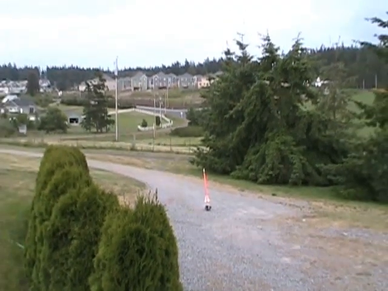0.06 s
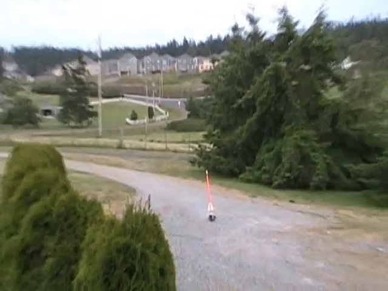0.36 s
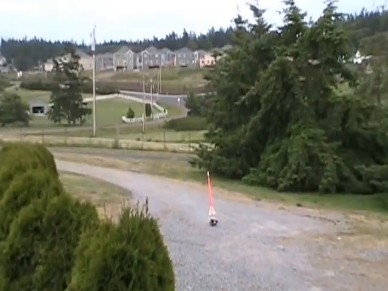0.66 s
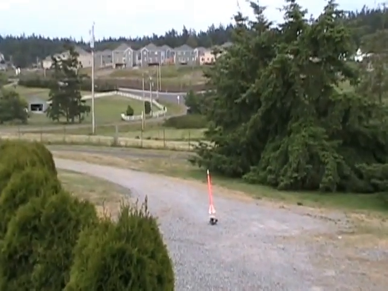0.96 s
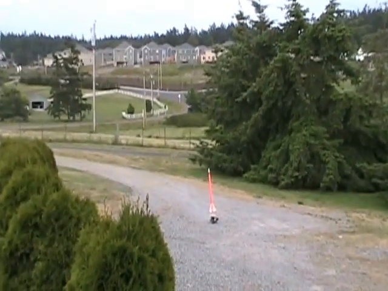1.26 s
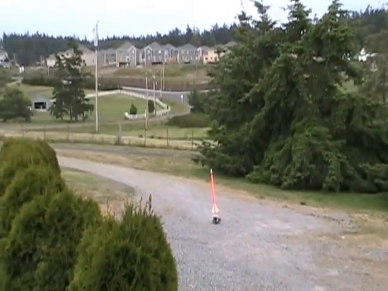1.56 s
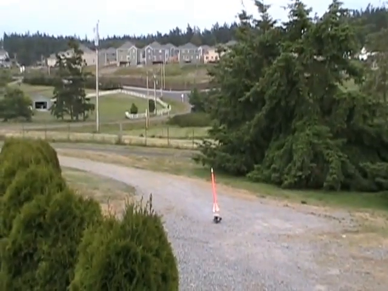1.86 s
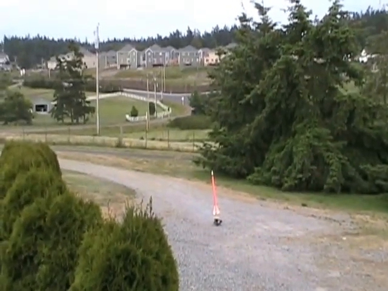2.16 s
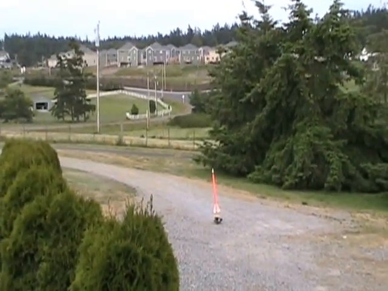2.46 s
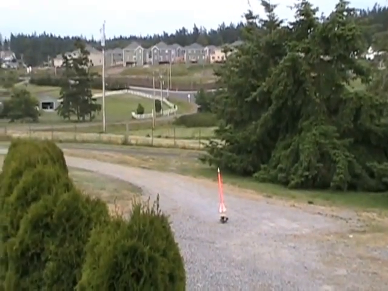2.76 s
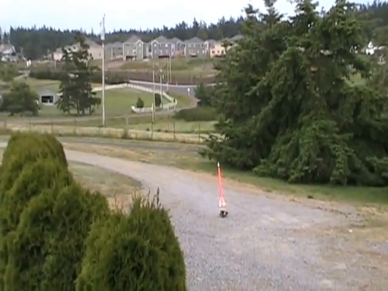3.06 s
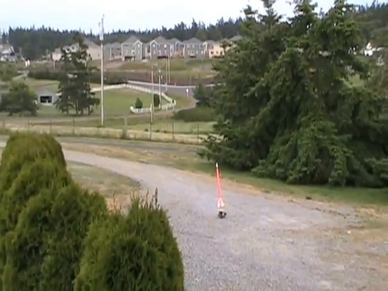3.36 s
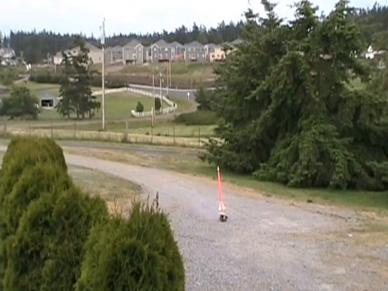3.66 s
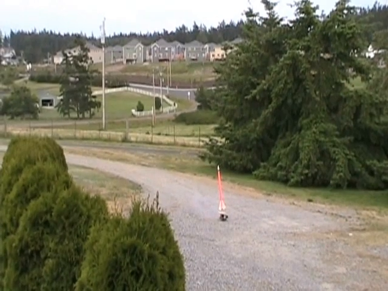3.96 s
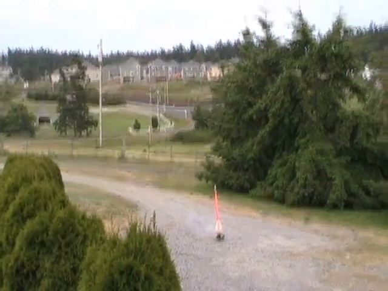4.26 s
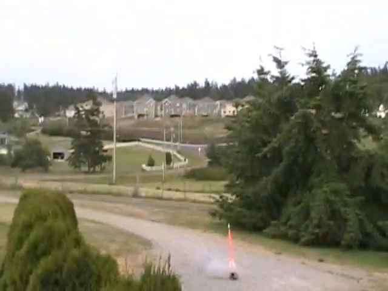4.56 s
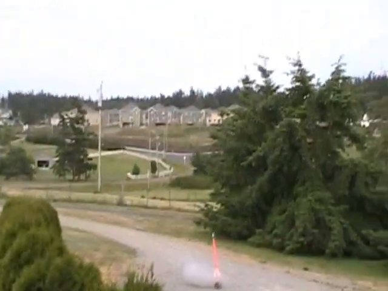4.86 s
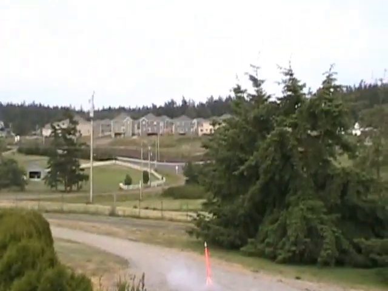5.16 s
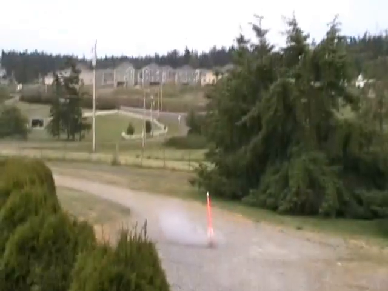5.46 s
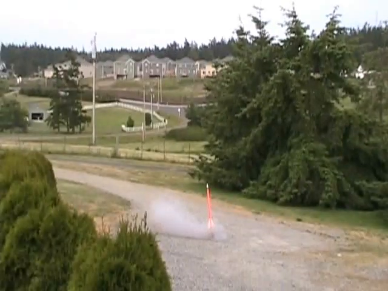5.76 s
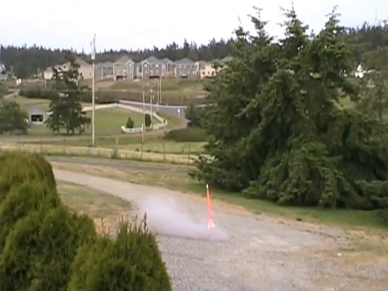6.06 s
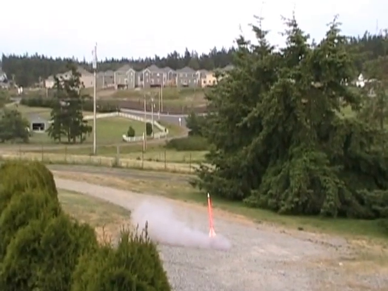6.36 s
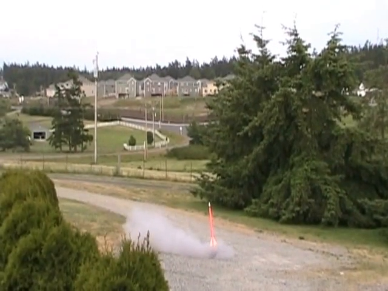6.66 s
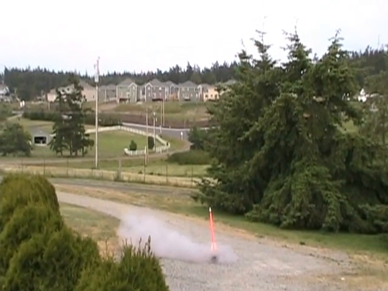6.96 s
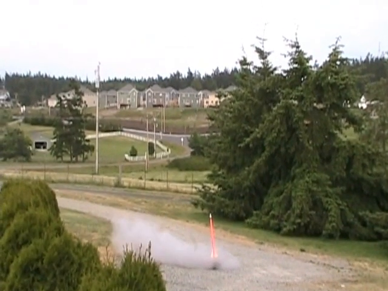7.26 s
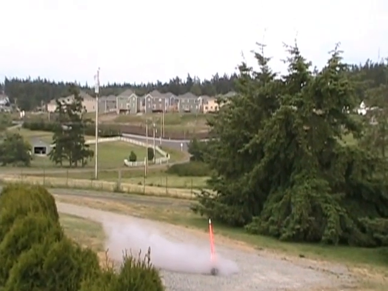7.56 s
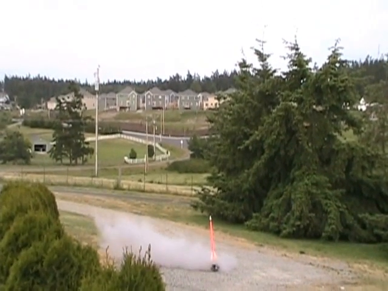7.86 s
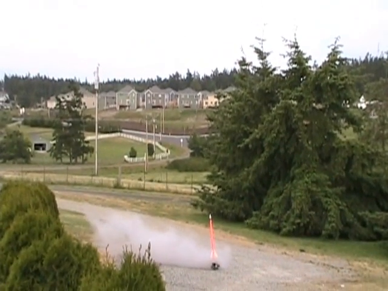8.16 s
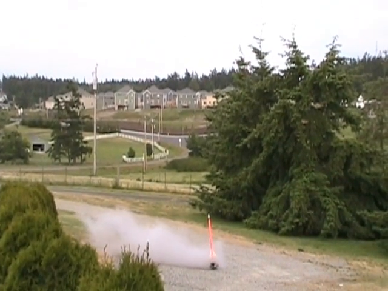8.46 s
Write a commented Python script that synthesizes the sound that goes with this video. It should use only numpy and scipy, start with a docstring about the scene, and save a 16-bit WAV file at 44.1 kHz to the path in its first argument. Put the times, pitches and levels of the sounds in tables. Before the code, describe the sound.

After faint bird chirps, a thin rising sizzle swells into a small rocket motor's strong, crackling hiss.

```python
"""Small rocket motor on a gravel driveway

A homemade motor burns some way from a hand-held tape camcorder. A thin sizzle climbs in pitch as the
fuel catches, then turbulent jet noise takes over: a surging hiss from fine eddies at the nozzle, a hollow
roar from large ones in the plume, crackle and one spit. Under it lie the quiet of the yard, birds, a far
yelp, a faint hum, the whine of the tape drive and wind on the two microphone ports."""
import sys
import numpy as np
from scipy import signal
from scipy.fft import rfft, irfft
from scipy.io import wavfile
from scipy.ndimage import uniform_filter1d

SR = 44100
rng = np.random.default_rng(int(sys.argv[2]) if len(sys.argv) > 2 else 0)


def generate_wav(signal):
    """Clip the signal to [-1, 1] and save it as 16-bit WAV at the path in sys.argv[1]."""
    frames = np.transpose(np.atleast_2d(signal))
    scaled = np.clip(frames, -1, 1) * 32767
    pcm = np.round(scaled).astype(np.int16)
    wavfile.write(sys.argv[1], SR, pcm)


N = 375291
TIME = np.arange(N) / SR

# The course of the burn. Each row: time in seconds, hiss level in dB, gas speed as a factor on pitch.
BURN = [(3.96, -44, 0.9), (4.13, -42.5, 0.84), (4.33, -41.5, 0.79), (4.6, -35.5, 0.89), (5.05, -34.5, 0.95),
        (5.6, -32.5, 0.98), (6.25, -32.5, 1.02), (6.75, -28, 1.065), (7.1, -29, 0.89), (7.35, -30.4, 0.91),
        (8.03, -38, 0.94), (8.5, -36.5, 0.93)]
# Surges as the grain flares. Each row: centre in seconds, length in seconds, extra hiss in dB.
SURGES = [(4.18, .12, 1.5), (4.76, 0.21, 2.5), (5.35, 0.19, 2), (5.62, 0.14, 2), (5.87, 0.17, 3.5),
          (6.955, 0.15, 3.0), (7.24, 0.2, 3), (7.7, 0.06, 2)]
CRUISE_DB = -32


def amp(db):
    """Decibels to amplitude ratio."""
    return 10 ** (np.asarray(db) / 20)


def unit(x):
    """Normalises to rms 1."""
    return x / np.sqrt(np.mean(x ** 2) + 1e-20)


def at_hz(points, hz):
    """Interpolates a spectrum on a log-frequency axis."""
    f, value = np.transpose(points)
    return np.interp(np.log(hz + 1), np.log(f + 1), value)


def at_time(rows, t):
    """Interpolates each column of a table in time."""
    s, *columns = np.transpose(rows)
    return [np.interp(t, s, column) for column in columns]


def add(mix, s, sound):
    """Superposes a sound on a track at s seconds."""
    part = mix[round(s * SR):][:len(sound)]
    part += sound[:len(part)]


def hump(t, s, length):
    """Gaussian pulse of height 1 centred on s, length wide at half height."""
    return .5 ** ((2 * (t - s) / length) ** 2)


def swells(rows, t):
    """Sum of Gaussian pulses, in dB."""
    return sum(db * hump(t, s, length) for s, length, db in rows)


def drift(rate_hz):
    """Random modulation: low-pass noise of rms 1."""
    hz = np.fft.rfftfreq(N, 1 / SR)
    return unit(irfft(rfft(rng.standard_normal(N)) / (1 + (hz / rate_hz) ** 4), N))


def noise(spectrum):
    """Stationary noise of rms 1, shaped by (Hz, dB) points."""
    gain = amp(at_hz(spectrum, np.fft.rfftfreq(N, 1 / SR)))
    return unit(irfft(rfft(rng.standard_normal(N)) * gain, N))


def grid(size):
    """Frame times (a column) and bin frequencies of short-time spectra."""
    return np.arange(4 * N // size + 5)[:, None] * size / 4 / SR, np.fft.rfftfreq(size, 1 / SR)


def turbulence(db, size, patchy_db, flicker_db):
    """Partially coherent noise at two ports, shaped in time and frequency; their mean has rms 1."""
    # Phase between the ports. Each row: frequency in Hz, lead of the left in radians.
    port_phase = [(100, 0.56), (2800, 0), (4600, 0.6), (6000, .6), (7800, 1.42), (11000, 1.74),
                  (14000, 1.85), (16000, 2.5)]
    # Their balance. Each row: frequency in Hz, left over right in dB.
    port_balance = [(200, -4.5), (700, 3.5), (1300, 2), (4000, 0), (5500, 2), (7000, -1.5), (8500, 1.8),
                    (11000, 3), (13500, 1)]
    # Their likeness. Each row: frequency in Hz, coherence from 0 to 1.
    port_coherence = [(200, .8), (700, .9), (2000, .75), (4200, .6), (7000, .78), (10000, .8), (15500, .72)]
    t, hz = grid(size)
    a, b, c, d, patches = rng.standard_normal((5, len(t), len(hz)))
    patches = unit(uniform_filter1d(uniform_filter1d(patches, size=10, axis=0), size=24, axis=1))
    flicker = unit(uniform_filter1d(rng.standard_normal(len(t)), size=8))[:, None]
    coherence = at_hz(port_coherence, hz)
    phase = at_hz(port_phase, hz)
    side = amp(at_hz(port_balance, hz) / 2)
    left = a + 1j * b
    right = (coherence * left + np.sqrt(1 - coherence ** 2) * (c + 1j * d)) * np.exp(-1j * phase)
    sum_gain = np.sqrt(side ** 2 + side ** -2 + 2 * coherence * np.cos(phase))
    shape = amp(db + patchy_db * patches + flicker_db * flicker) / sum_gain
    spectra = np.array([left * side, right / side]) * shape
    x = signal.istft(spectra, nperseg=size, noverlap=size - size // 4, time_axis=1, freq_axis=2)[1]
    return x[:, :N] / np.std(x[:, :N].mean(0))


def yard(air_db=-51.5, port_db=-45):
    """Ambient noise: distant wash reaches the ports in phase, their own rumble is in antiphase."""
    # Outdoor wash. Each row: frequency in Hz, relative spectral density in dB.
    air_spectrum = [(15, -25), (45, -7.5), (85, -1), (130, -4.5), (175, -4.5), (240, -5.5), (430, -10.5),
                    (700, -6), (880, -9.5), (1240, -10), (2300, -14.5), (4000, -13), (6000, -15.5),
                    (9000, -20.5), (15500, -26.5)]
    # The ports' rumble in calm air, with the same columns.
    port_spectrum = [(12, -30), (30, -3), (85, -2.5), (170, -3.5), (280, -8.5), (500, -15), (1100, -20.5),
                     (1800, -29.5), (3000, -27.5), (4500, -27), (12000, -28.5), (15500, -30)]
    air = amp(air_db + .85 * drift(2.7)) * noise(air_spectrum)
    rumble = amp(port_db + .5 * drift(6)) * noise(port_spectrum)
    return np.array([air + rumble, air - rumble]) * amp([[.3], [-.3]])


def rustle(rise_s=.1, fall_s=.17, rest_db=-68, brighten_s=3.3):
    """Amplitude-modulated noise: a faint high rustle swells, and brightens as a higher fizz grows."""
    # Swells of the rustle. Each row: start in seconds, length in seconds, relative level in dB.
    rustles = [(0, .8, -54.5), (1.08, .4, -55.5), (1.92, 0.4, -56), (2.73, 0.15, -56.5), (3.4, 0.064, -61)]
    body_spectrum = [(3000, -31), (5000, 1), (6800, 3), (10000, -3.5), (13000, -19), (16000, -20)]
    fizz_spectrum = [(8000, -31), (11000, 3), (12500, 2), (15700, -.5), (17500, -40)]
    _, hz = grid(size=512)
    body = turbulence(at_hz(body_spectrum, hz), size=512, patchy_db=1.6, flicker_db=.7)
    fizz = turbulence(at_hz(fizz_spectrum, hz), size=512, patchy_db=1.2, flicker_db=1)
    swell = amp(rest_db)
    for s, length, db in rustles:
        swell += amp(db) * np.interp(TIME - s, [-rise_s, 0, length, length + fall_s], [0, 1, 1, 0])
    fizz_gain = amp(np.interp(TIME, [0, brighten_s], [-72, -63])) * (swell / amp(rest_db)) ** .25
    return body * swell * amp(-2.5) + fizz * fizz_gain


def hum(hz=318, waver=.01197, start_db=-72.5, grows_from_s=3.7, db_per_s=3):
    """A faint, growing tone under random frequency and amplitude modulation."""
    pitch = hz * (1 + waver * drift(12.3))
    db = start_db + db_per_s * np.maximum(TIME - grows_from_s, 0)
    return np.sqrt(2) * amp(db + 1.5 * drift(6)) * np.sin(2 * np.pi * np.cumsum(pitch) / SR)


def tape_drive(flutter=.00051, waver_db=1.86):
    """Rotating machinery: the head drum and its motor radiate tones, and close pairs beat."""
    # Drive tones. Each row: frequency in Hz, rms level in dB.
    tones = [(86, -67), (167, -65), (2918, -70), (2934, -75), (3499, -65.5), (3515, -67.5), (4393, -68),
             (4425, -68), (4667, -63), (4683, -61.5), (5023, -81), (5249, -71), (5265, -76), (5835, -68),
             (5852, -66.5), (9948, -76), (11536, -81), (11666, -77), (11703, -71.5)]
    clock = TIME + np.cumsum(flutter * drift(26)) / SR
    out = np.zeros((2, N))
    for hz, db in tones:
        phase, right_lead = rng.uniform(0, 2 * np.pi), rng.uniform(-2, 1)
        tone = np.sqrt(2) * np.sin(2 * np.pi * hz * clock + phase + np.array([[0], [right_lead]]))
        out += amp(db + waver_db * drift(21)) * tone
    return out


def wind(calm_db=-56, bump_hz=42, bump_s=.007, shared_db=-15):
    """Pressure fluctuations: gusts and bumps drive the ports in antiphase, with a weak in-phase part."""
    # Gusts on the microphone. Each row: centre in seconds, length in seconds, level in dB.
    gusts = [(3.88, .1, -51), (4.963, .1, -36), (5.88, 0.099, -36), (6.65, .1, -43), (7.32, 0.065, -39),
             (7.528, 0.14, -36.5)]
    breeze = (7.3, 2, -47)  # one long, weak gust
    # Low bumps on the microphone. Each row: start in seconds, envelope peak in dB.
    bumps = [(3.905, -25), (4.765, -23), (4.912, -16), (5.89, -28), (7.19, -26), (7.49, -24)]
    eddies = [(10, -24), (25, -7), (45, 2.5), (65, -2.5), (100, -12), (250, -38), (1500, -80)]
    strength = amp(calm_db) + sum(amp(db) * hump(TIME, s, length) for s, length, db in [breeze, *gusts])
    strength *= amp(1.7 * drift(10))
    opposed = strength * noise(eddies)
    shared = strength * noise(eddies) * amp(shared_db)
    t = np.arange(0, .1, 1 / SR)
    bump = t / bump_s * np.exp(1 - t / bump_s) * np.sin(2 * np.pi * bump_hz * t)
    for s, db in bumps:
        add(opposed, s, amp(db) * bump)
    return np.array([shared + opposed, shared - opposed])


def yelp(second_db=-9, arch=.05):
    """A far animal's voiced call: two harmonics on a slightly arched pitch."""
    # The call: start in seconds, length in seconds, top pitch in Hz, level in dB.
    call = (2.82, .12, 728, -53)
    s, length, hz, db = call
    u = np.linspace(0, 1, round(length * SR))
    phase = 2 * np.pi * np.cumsum(hz * (1 - arch * (2 * u - 1) ** 2)) / SR
    out = np.zeros(N)
    add(out, s, amp(db) * np.sin(np.pi * u) * (np.sin(phase) + amp(second_db) * np.sin(2 * phase)))
    return out


def birds(scoop_s=.011, quaver=.0072):
    """Frequency-modulated whistles: far notes glide to a held pitch, quaver and fade."""
    # Each row: start in seconds, length in seconds, level in dB, held pitch in Hz, starting pitch ratio.
    notes = [(1.052, .088, -52, 3790, .87), (1.25, .088, -51, 3790, 0.81), (1.44, .08, -59, 2380, 1.0),
             (1.452, .088, -53, 3800, .9), (1.935, .04, -55, 4700, 1.22), (4.04, .088, -52, 3490, 1.0)]
    out = np.zeros(N)
    for s, length, db, held, ratio in notes:
        t = np.arange(0, length, 1 / SR)
        scoop = (ratio - 1) * np.exp(-(t / scoop_s) ** 2 / 2)
        pitch = held * (1 + scoop + quaver * drift(150)[:len(t)])
        envelope = np.interp(t / length, [0, .15, .45, 1], [0, .98, 1, .27])
        add(out, s, amp(db) * envelope * np.sin(2 * np.pi * np.cumsum(pitch) / SR))
    return out


def ticks_and_spit(size=2048):
    """Damped transients: ticks in the yard and the motor's spit are noise bands decaying exponentially."""
    # Each row: start in seconds, peak in dB, centre in Hz, width in octaves, 60 dB decay time in seconds.
    bursts = [(.167, -43, 3300, .2, .03), (.967, -41, 2900, .3, .025), (3.37, -45, 3000, .2, .02),
              (4.53, -19, 1800, 1.4, 0.011), (4.5331, -24.5, 800, 0.96, 0.0097)]
    t, hz = np.arange(size) / SR, np.fft.rfftfreq(size, 1 / SR)
    out = np.zeros(N)
    for s, db, centre, octaves, t60 in bursts:
        band = np.exp(-.5 * (np.log2((hz + 1) / centre) / octaves) ** 2)
        burst = irfft(band * np.exp(2j * np.pi * rng.random(len(hz)))) * amp(-60 * t / t60)
        add(out, s, amp(db) * burst / abs(burst).max())
    return out


def thrust_db():
    """Level of the burn, with its surges, relative to cruising strength."""
    return at_time(BURN, TIME)[0] + swells(SURGES, TIME) - CRUISE_DB


def crackle(per_s=110, relative_db=-3, spread_db=8, start_s=4.1):
    """Shot noise: burning grains snap at random in the exhaust, louder when the jet is strong."""
    sizes = amp(spread_db * np.minimum(rng.exponential(1, N), 2))
    impulses = sizes * (rng.random(N) < per_s / SR) * rng.choice([-1, 1], N)
    snaps = signal.sosfilt(signal.butter(1, [900, 9000], "bandpass", fs=SR, output="sos"), impulses)
    snaps *= 2 * amp(CRUISE_DB + thrust_db() + relative_db) * (TIME > start_s)
    return np.array([snaps, np.roll(snaps, 1)])


def sizzle(relative_width=.13):
    """Narrow-band flow noise: gas first seeps from the nozzle, its pitch climbing with the pressure."""
    # The fuel catching. Each row: time in seconds, pitch in Hz, level in dB.
    ignition = [(2.5, 4500, -80), (2.88, 4620, -58), (3.2, 4900, -58), (3.5, 4870, -56.5),
                (3.66, 5560, -52.5), (3.92, 5700, -53), (4.04, 5700, -47), (4.13, 5740, -43),
                (4.3, 5400, -51), (4.6, 5500, -68)]
    t, hz = grid(size=512)
    pitch, _ = at_time(ignition, t)
    _, level_db = at_time(ignition, TIME)
    band_db = -20 * np.log10(1 + (np.log((hz + 1) / pitch) / relative_width) ** 2)
    return turbulence(band_db, size=512, patchy_db=.5, flicker_db=0) * amp(level_db)


def jet(roar_db=-39, spray_db=-42, light_s=3.97, rise_s=.19, roar_builds_s=.39):
    """Turbulent jet noise: a hiss whose frequencies scale with gas speed, a fizzing spray and a roar."""
    # Fine turbulence at the nozzle. Each row: frequency in Hz, relative spectral density in dB.
    hiss_spectrum = [(1200, -24.5), (2400, -13.5), (3300, -8.5), (4100, -6.5), (5000, -4), (6300, -0.5),
                     (8000, -1.5), (10000, -4), (12500, -15), (15700, -29)]
    # Large eddies of the plume with their ground reflection, with the same columns.
    roar_spectrum = [(30, -32), (120, -15.5), (300, -9.5), (400, -10.5), (570, -0.2), (730, 0), (980, -7),
                     (1250, -5), (1900, -6), (2150, -9), (2500, -9), (3300, -20), (6000, -42)]
    spray_spectrum = [(7000, -37), (10500, -2.5), (12800, -.5), (15700, -.5), (17500, -40)]
    # Peaks and dips from the ground and the camera's shell. Each row: centre in Hz, width in Hz, gain in dB.
    path = [(770, 110, 2), (1010, 130, -2), (1160, 110, 2), (2190, 160, -3), (2950, 160, 1.5),
            (3270, 170, -3), (3720, 170, -3), (4750, 200, 1.5), (6100, 300, 1.2), (8200, 400, -1.8),
            (10030, 300, 1.2), (11450, 400, 1.5)]
    # Billows of the plume. Each row: centre in seconds, length in seconds, extra roar in dB.
    billows = [(4.75, .32, 3.8), (6.16, .15, 3), (7.39, 0.43, 5)]
    t, hz = grid(size=1024)
    path_db = sum(db * np.exp(-.5 * ((hz - centre) / (width / 2)) ** 2) for centre, width, db in path)
    speed = at_time(BURN, t)[1] * amp(.13 * swells(SURGES, t))
    shifted_db = at_hz(hiss_spectrum, hz / speed) - 10 * np.log10(speed)
    hiss = turbulence(shifted_db + path_db, size=1024, patchy_db=.6, flicker_db=.2)
    spray = turbulence(at_hz(spray_spectrum, hz) + path_db, size=1024, patchy_db=.7, flicker_db=2)
    roar = turbulence(at_hz(roar_spectrum, hz) + path_db, size=1024, patchy_db=.9, flicker_db=.4)
    push_db, sputter_db = thrust_db(), drift(4.9)
    gas = hiss * amp(CRUISE_DB + push_db) + spray * amp(spray_db + 1.03 * push_db + sputter_db)
    # the plume takes a moment to build after the motor lights
    lag_db = -4 * np.exp(-((TIME - light_s) / roar_builds_s) ** 2)
    plume = roar * amp(roar_db + .69 * push_db + swells(billows, TIME) + lag_db)
    # the grain burns unevenly, so the whole jet flutters together
    flutter = amp(.43 * drift(51))
    lit = np.clip((TIME - light_s) / rise_s, 0, 1)
    return flutter * (lit ** 2 * gas + lit ** 4 * plume)


def scene():
    """Superposition of the motor, the yard and the camera's own noises."""
    motor = sizzle() + jet() + crackle()
    return motor + ticks_and_spit() + birds() + yelp() + yard() + rustle() + hum() + wind() + tape_drive()


def record(dry):
    """Band limiting: the camera acts as a steep low-pass filter."""
    lowpass = signal.firwin(1023, cutoff=15780, window=("kaiser", 9), fs=SR)
    return signal.oaconvolve(dry, lowpass[None], "same")


dry = scene()
out = record(dry)
generate_wav(out)
```